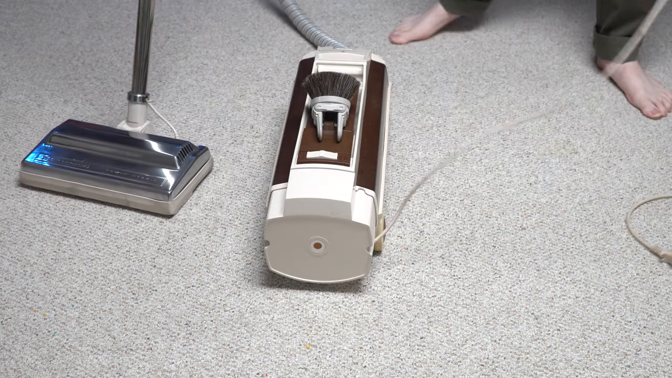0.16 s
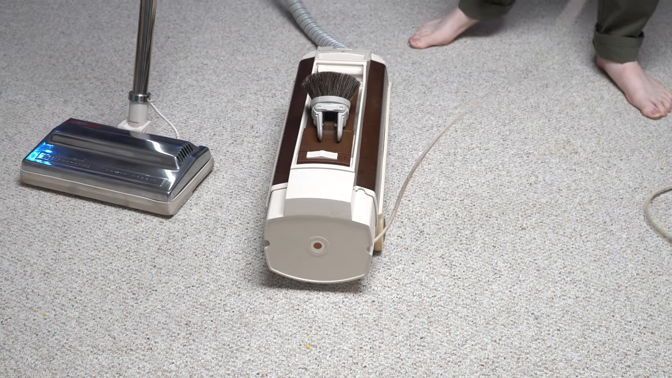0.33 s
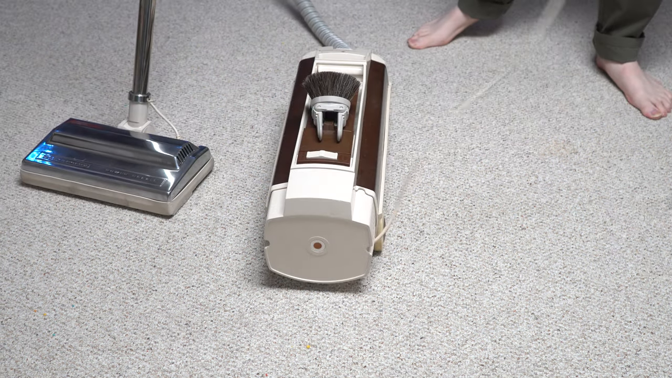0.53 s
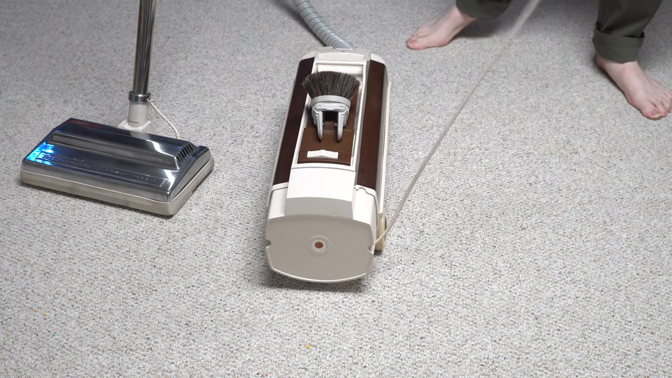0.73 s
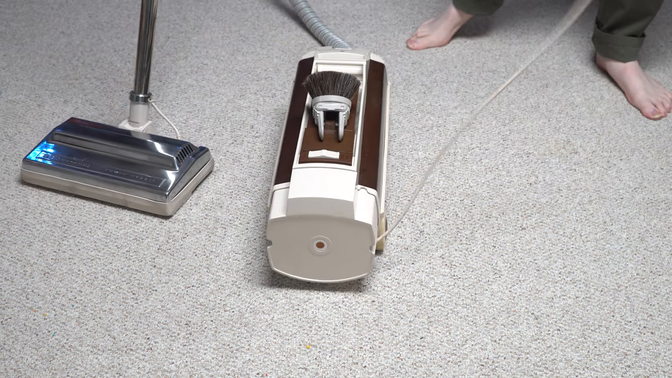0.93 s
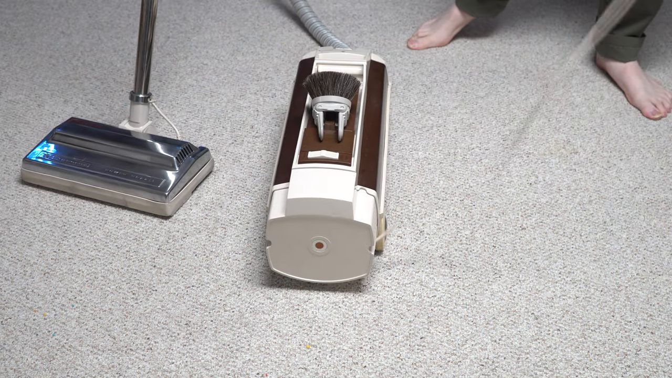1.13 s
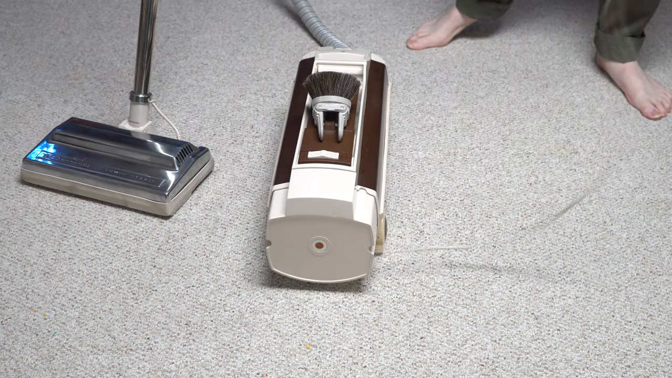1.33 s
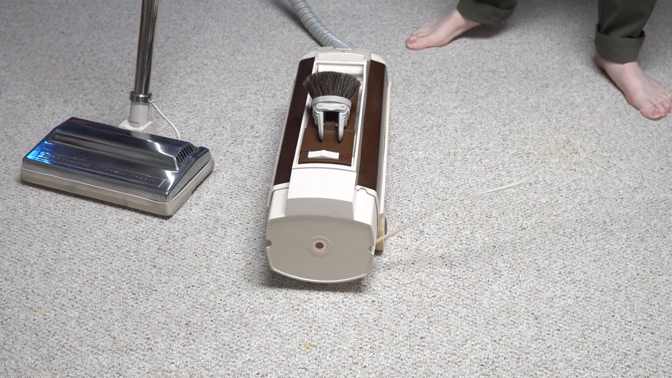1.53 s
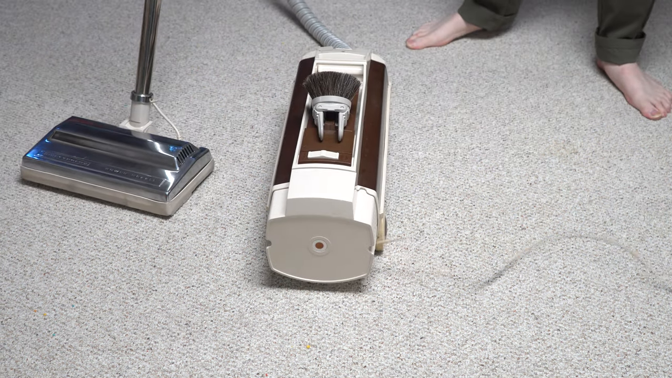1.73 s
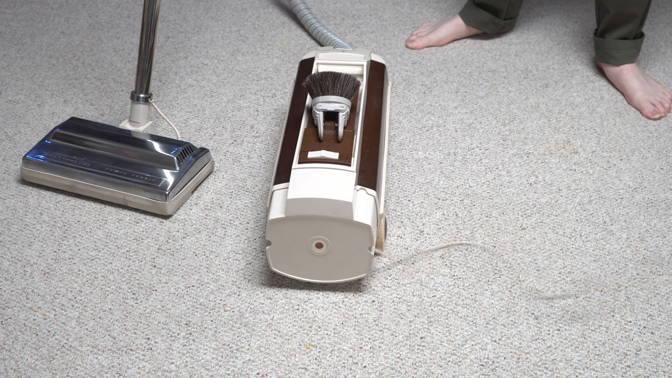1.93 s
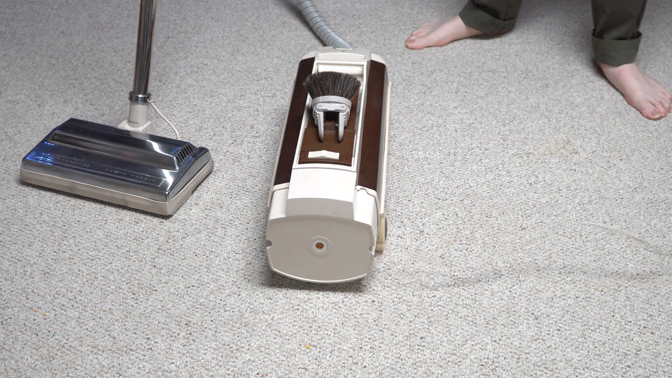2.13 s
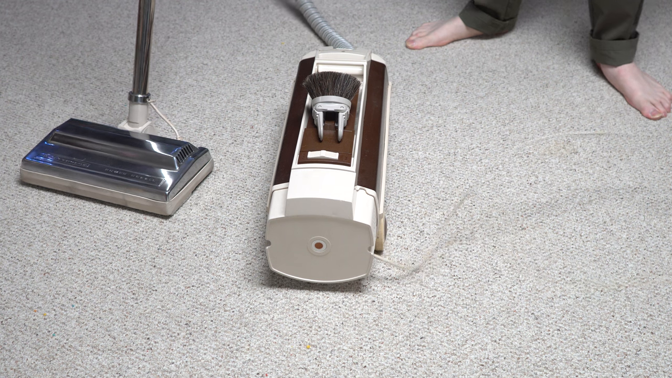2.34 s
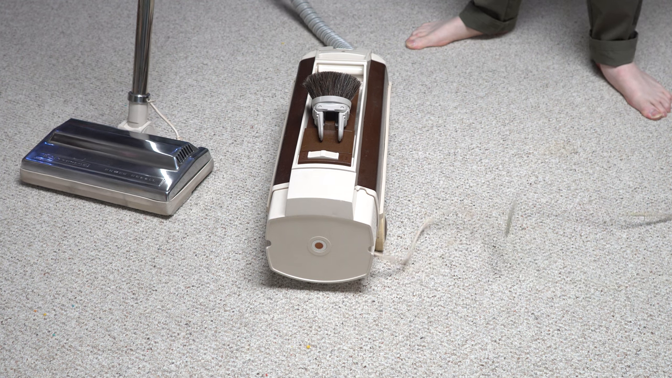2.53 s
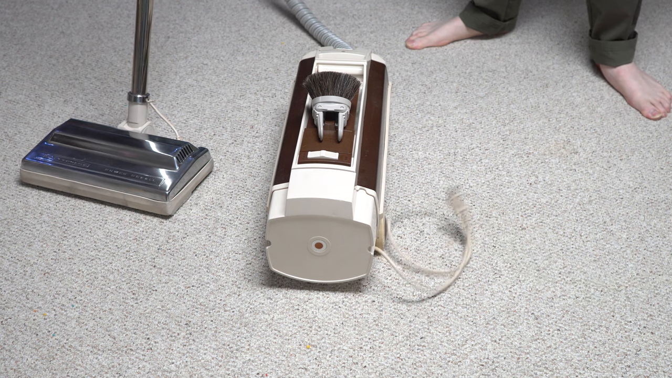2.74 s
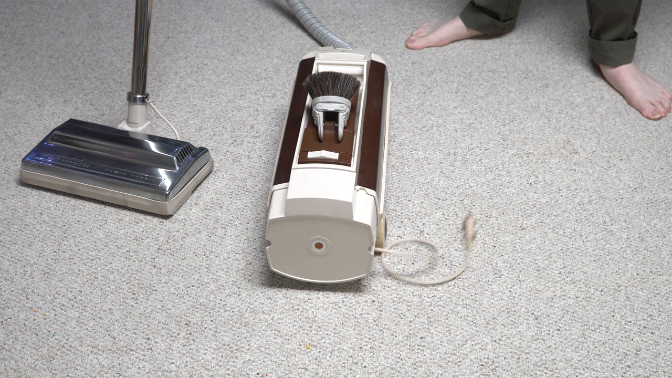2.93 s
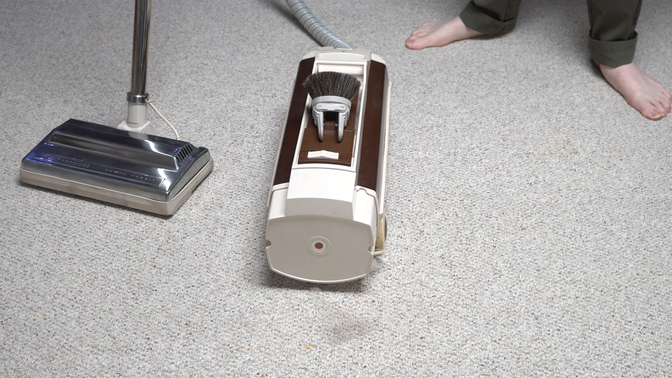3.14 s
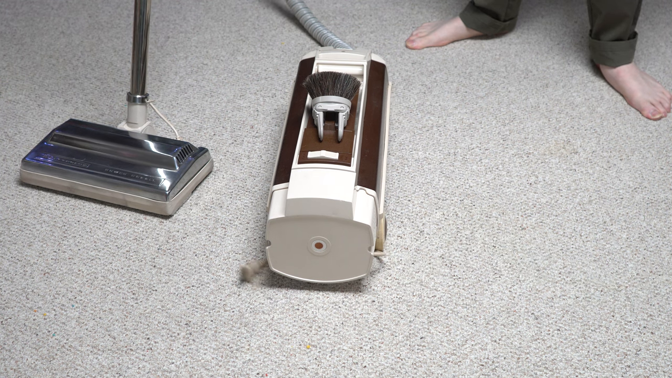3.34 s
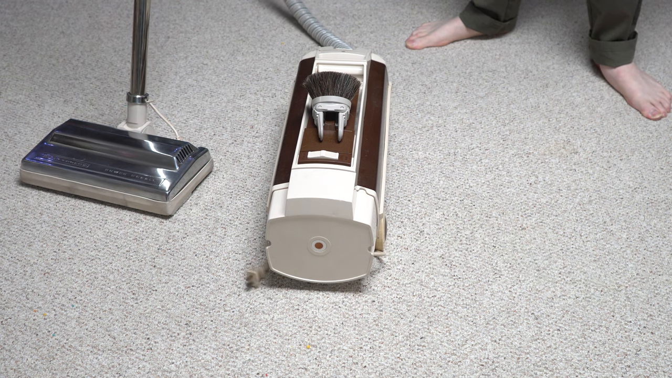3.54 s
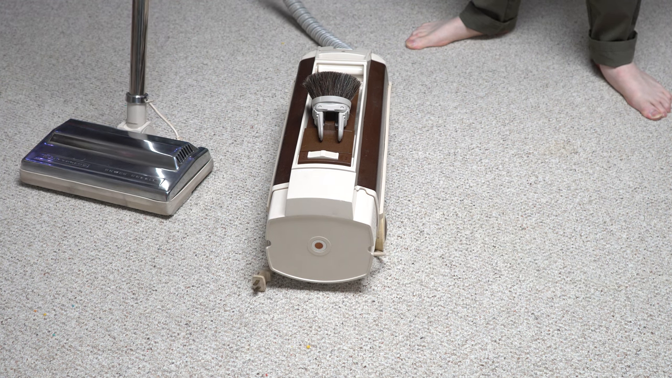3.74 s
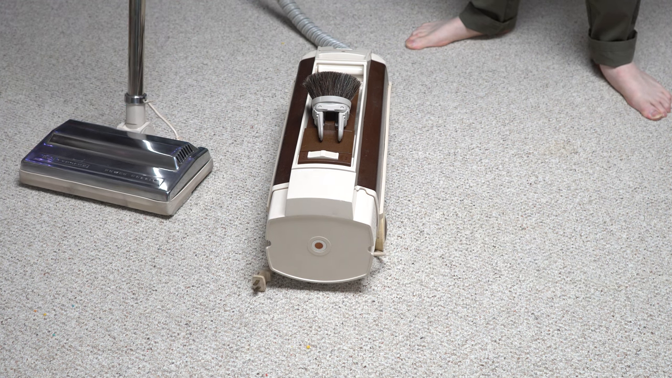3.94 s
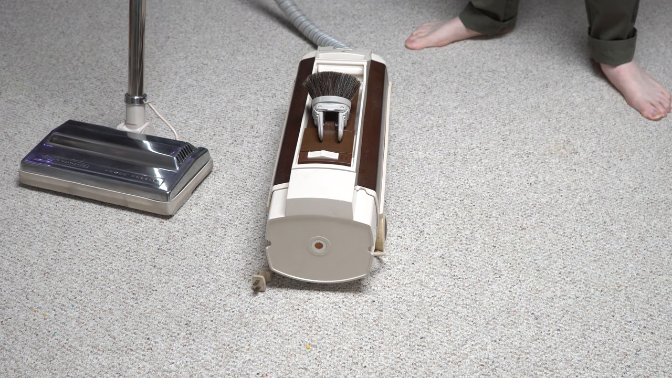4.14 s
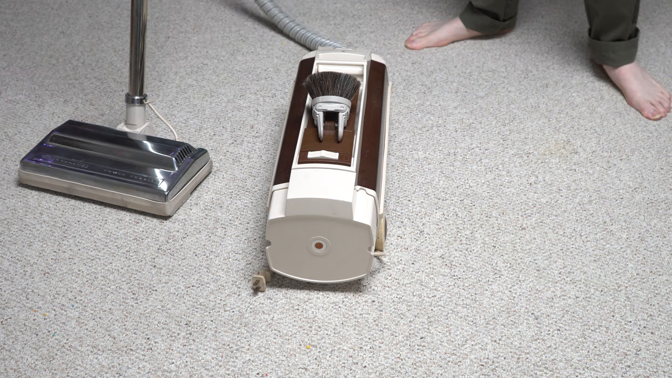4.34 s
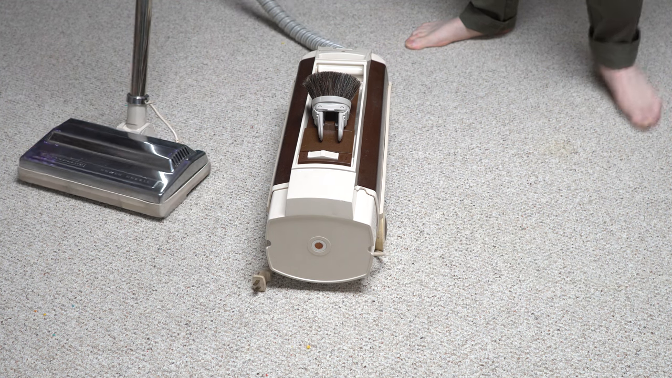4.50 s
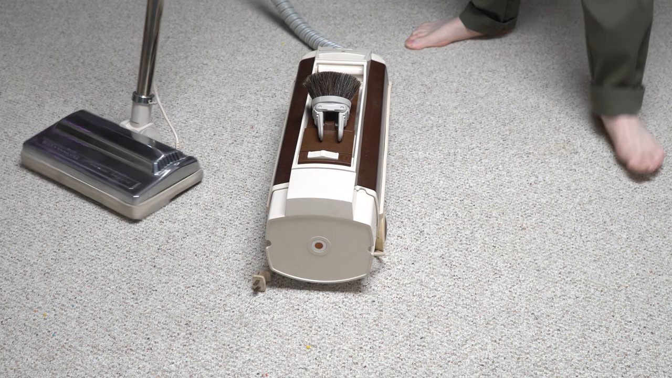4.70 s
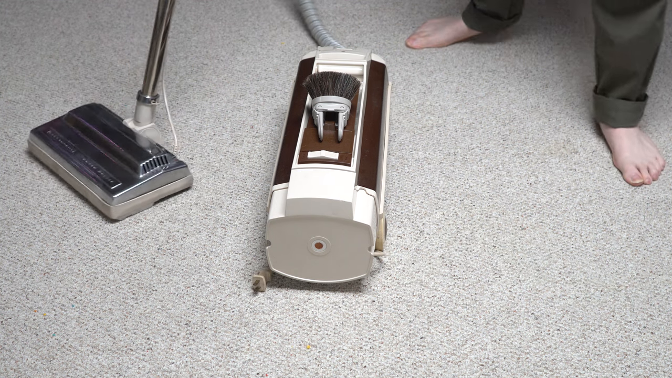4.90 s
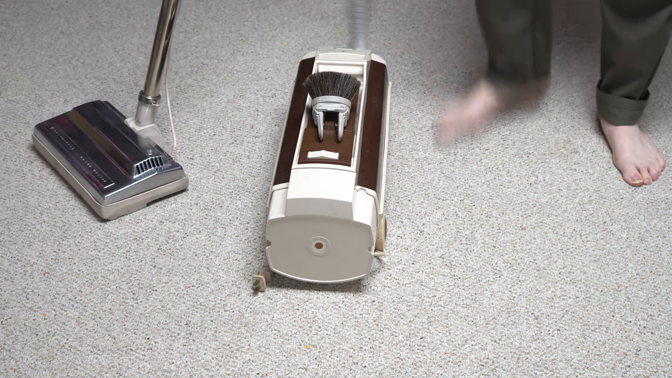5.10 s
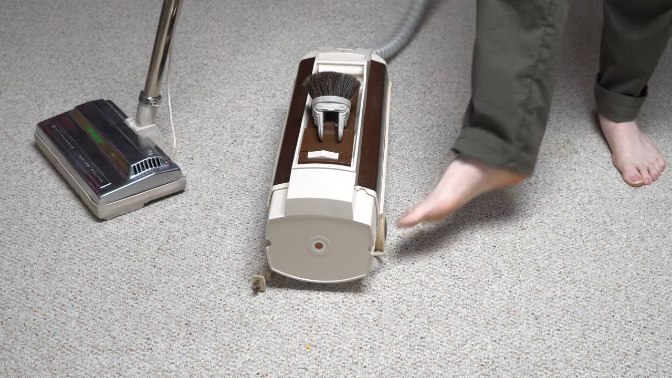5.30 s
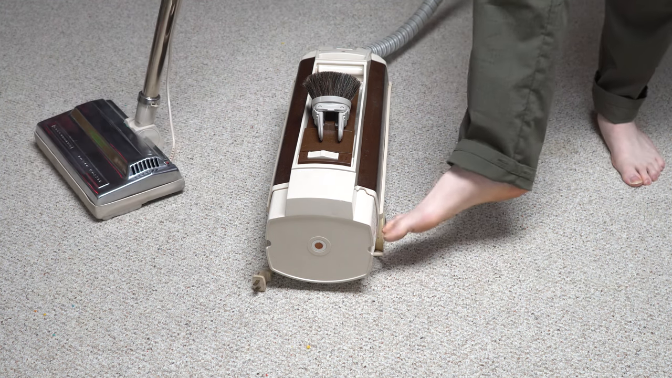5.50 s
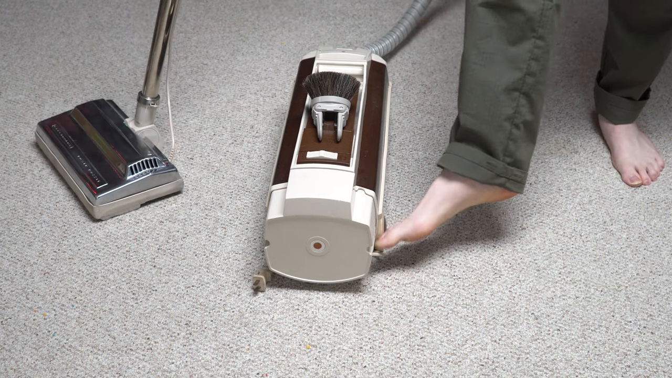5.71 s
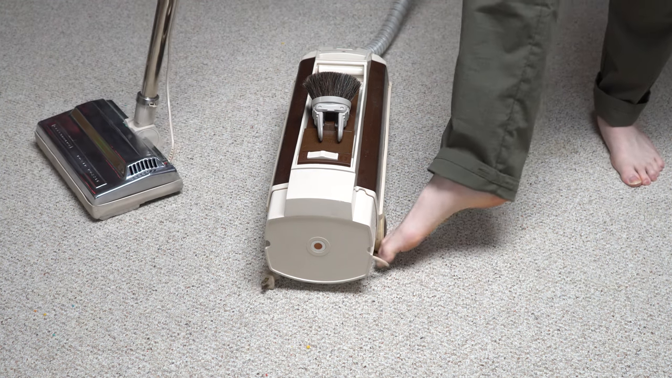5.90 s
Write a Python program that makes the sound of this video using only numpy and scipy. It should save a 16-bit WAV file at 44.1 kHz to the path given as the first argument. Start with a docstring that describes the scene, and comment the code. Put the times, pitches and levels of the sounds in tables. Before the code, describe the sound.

A spring-loaded cord drum spins inside a hollow plastic vacuum cleaner, heard close up and fairly dry. After light ticks it erupts into about a second of irregular hard clacking, rattle, low rumble and brief squeaks, slackens, then knocks again as the plug arrives. Afterwards the casing ticks faintly, footsteps scuff the carpet, and a foot touches the casing with small clicks over soft background hiss.

```python
"""Quiet carpeted room: the spring reel in a plastic vacuum cleaner winds its cord in.
Knocks ring the casing modes, the drum rumbles, rattles and squeaks, cord and plug thud as damped modes,
the sliding cord whizzes as resonant noise; afterwards the casing ticks faintly.
Feet and cord scuff the carpet as dense grains over a dull drag; a short room tail and faint hiss lie under it.
"""
import sys
import numpy as np
from scipy import signal
from scipy.fft import rfft, irfft
from scipy.io import wavfile

SR = 44100
rng = np.random.default_rng(int(sys.argv[2]) if len(sys.argv) > 2 else 0)


def unload_audio(sound):
    """Save the sound as a 16-bit wav file, at the path given as the first command line argument."""
    columns = np.transpose(np.atleast_2d(sound))
    # keep every value between -1 and 1, then stretch to whole-number steps
    steps = np.round(np.clip(columns, -1, 1) * 32767)
    wavfile.write(sys.argv[1], SR, steps.astype(np.int16))


N = 267246  # samples

# casing modes: f/Hz, width/Hz, relative level/dB
CASING_MODES = [(1129, 94, 2.5), (1497, 60, 2.6), (1828, 11, 2.5), (2525, 57, -2), (3060, 220, -11.5),
                (3670, 183, -0.5), (4020, 510, 0.5), (4500, 330, -5), (5080, 370, -11.5), (6250, 42, -14.5),
                (9440, 44, -31.5), (9800, 19, -35), (10230, 2200, -15.5), (11300, 52, -27.5)]
# broad colour of a knock: f/Hz, spectrum level/dB per Hz
CLACK_SPECTRUM = [(88, -48), (150, -0.5), (376, -6.5), (979, -4.5), (1290, -1.5), (1500, -8), (1660, -0.5),
                  (2500, 2.5), (3290, 3.5), (3700, 6.5), (8900, -32), (10600, -59), (16000, -43)]


def casing(drive, ring_db, strengths_db):
    """A hit plastic shell gives a broad clack plus its modes, each driven with its own strength."""
    rings = 0
    for (hz, width_hz, db), strength_db in zip(CASING_MODES, strengths_db):
        rings = rings + from_db(db) * resonate(drive * from_db(strength_db), hz, width_hz)
    return coloured(drive, CLACK_SPECTRUM) + from_db(ring_db) * rings


# drum cavity modes: f/Hz, width/Hz, relative level/dB
CAVITY_MODES = [(277, 200, -12), (386.3, 68, 4), (473.5, 110, -1), (691, 59, 1), (818, 84, -7)]
# knocks on the casing: t/s, middle-band peak level/dB, bass level/dB re middle,
# brightness level/dB re middle (before the two offsets below), leading mode f/Hz, chatter decay/ms
KNOCKS = [(0.0318, -35.5, -3.5, -32, 2860, 11), (0.167, -45, -6, -28, 2260, 4.3),
          (0.5328, -52, -1, -22, 1010, 6.6), (0.764, -48, 0, -20, 1490, 5), (0.779, -43, 2, -26, 1140, 16),
          (.832, -32, -15, -14, 1890, 7.9), (0.855, -21, -35, -15.5, 4504, 2.8),
          (.873, -44, -20, -9, 1880, 8.2), (0.8819, -26, -20, -3, 1940, 5.9),
          (0.924, -35, -14, -6.5, 4650, 11), (0.957, -44, -18, -20, 5090, 9.5),
          (1.0221, -57.5, 15, -19, 1130, 6.5), (1.122, -40.5, -8, -30, 1520, 33),
          (1.1636, -35.5, -7, -16, 1850, 14), (1.2, -26, -20, -20, 2530, 18),
          (1.3257, -19.5, -34, -30, 1510, 9.3), (1.3458, -20, -10, -15, 1770, 8.3),
          (1.3516, -11.5, -16, -10, 3870, 6.2), (1.3579, -6.5, -30, -13, 3840, 2.8),
          (1.4098, -21, -0.5, -27, 1040, 7.2), (1.4314, -21, -4.5, -29, 2530, 20),
          (1.4636, -12.5, -34, -8.5, 2550, 3.5), (1.51, -19, -5.5, -22, 1500, 12.4),
          (1.5752, -13, -42, -25, 2550, 7.6), (1.6069, -27, -5, -21, 2560, 7),
          (1.6396, -32, -4, -3, 2540, 12), (1.6712, -17, -12, -19, 1130, 24),
          (1.7051, -23, -3, -32, 1130, 9.3), (1.739, -19, -14, -16, 4500, 9),
          (1.8239, -13.5, -15, -9, 3700, 3.8), (1.8638, -8, -36, -17, 1500, 10),
          (1.9119, -12, -34, -8, 3440, 6), (1.9282, -20, -24, -24, 1090, 7.5),
          (1.9594, -25, -2, -25, 1500, 11), (1.993, -18.5, -2.5, -16, 1510, 21),
          (2.026, -13, -2.5, -13.5, 1060, 3.2), (2.062, -13, -35, -21, 1490, 8.8),
          (2.101, -21, -7, -14, 1140, 7), (2.1105, -13, -17, -16, 1110, 8.8),
          (2.147, -16.5, -5, -35, 2580, 4.8), (2.1851, -17, -21, -33, 3030, 6.4),
          (2.203, -23.5, 4, -29, 1010, 5), (2.222, -8, -21, -16.5, 3900, 6.7),
          (2.2416, -17.5, -8, -26, 1490, 13), (2.2751, -25, 0.5, -18, 2520, 23),
          (2.2862, -15, -7.5, -20, 1460, 6.3), (2.3835, -19.5, -30, -20, 3010, 10),
          (2.4068, -17, -6, -35, 1500, 12), (2.453, -29.5, -1, -30, 1520, 15),
          (2.4905, -19.5, -32, -16, 4110, 6.8), (2.4974, -9, -20.5, -16, 3710, 7.3),
          (2.5121, -12, -34, -13, 4040, 9.3), (2.621, -40, 2, -8, 1810, 6), (2.698, -45.5, 1, -2, 1090, 4),
          (2.7299, -22, -11, -19, 3060, 10), (2.7522, -14, -5.5, -37, 2540, 7.3),
          (2.771, -27, 3.5, -32, 2060, 11), (2.7894, -18.5, -23, -21, 1150, 8.4),
          (2.801, -21.5, -3.5, -31, 1100, 6.3), (2.8508, -33.5, 0.5, -28, 1490, 6.5),
          (2.8575, -34, 5, -27, 1480, 9.9), (2.9207, -32.5, -7.5, -28, 1520, 21),
          (2.9339, -35, 4, -19, 1080, 8), (3.0027, -30, -13, -28, 1830, 2.5),
          (3.0224, -30, -13, -30, 2560, 2.4), (3.058, -17, -12, -16, 3040, 16),
          (3.0665, -19, -9, -36, 3600, 5.6), (3.087, -13.5, -30, -26, 4000, 7.8),
          (3.0931, -14, -28, -18, 3970, 6.4), (3.125, -30, -1.5, -29, 3640, 17),
          (3.1659, -31.5, -1, -14, 3260, 17), (3.3461, -46, 6.5, -26, 1080, 9.9),
          (3.4062, -48, 8, -26, 1190, 3.3), (3.4518, -54, 8.5, -21, 1180, 7.4),
          (3.5276, -54, -4.5, -22, 1187, 5), (3.5998, -60, 11.5, -19, 1180, 11),
          (3.715, -52.5, 7, -22, 1250, 5.5), (3.8831, -51, 6, -21, 1240, 9.3),
          (4.1338, -45.5, -26, -4.5, 2620, 15.6), (4.261, -51.5, 0.5, -24, 2670, 15),
          (4.296, -48, 4, -24, 1230, 15), (4.413, -55, -7, -3, 1850, 7.4),
          (4.5036, -52, 10, -21, 1090, 4.8), (4.5688, -51.5, -14, -16, 1200, 6),
          (4.7083, -56.5, -20, 3, 2770, 4.6), (5.026, -48, -25, -20, 2220, 4.1),
          (5.4903, -53.5, 6, -28, 1180, 7.5), (5.603, -50, -13.5, -19, 2760, 2.9),
          (5.679, -50, -19, -22, 3710, 4.5), (5.6896, -49, -19, -24, 4000, 4.3),
          (5.6977, -34.5, -13, -38, 3050, 7.1), (5.7414, -50.5, 19, -32, 1110, 4.4),
          (5.7548, -44, -10.5, -29, 2570, 7.9), (5.8245, -44, -5, -22, 2650, 6.3),
          (5.885, -58, 13.5, -15, 1110, 6), (5.9075, -44.5, -5, -24, 1100, 4.6),
          (5.961, -44, 0, -28, 2500, 3.6), (5.9982, -48, 5, -22, 1100, 21)]
FIRST_TOUCH_DB = 2.5  # one clean contact opens every knock
KNOCK_RISE_MS = 0.68
TREBLE_OFFSET_DB, AIR_OFFSET_DB = 1.2, -4.05  # re brightness


def knocks():
    """A knock is a short chatter of contacts; where it lands sets bass, treble and leading modes."""
    size = SR // 6
    out = np.zeros(N + size)
    ms = np.arange(size) * 1000 / SR
    middle_band = band_filter(3, 1300, 6000)
    bass_band = band_filter(3, 170, 1300)
    treble_band = band_filter(3, 6000, 9000)
    air_band = band_filter(3, 9000, 14500)
    mode_hz = np.array(CASING_MODES)[:, 0]
    for s, peak_db, bass_db, bright_db, lead_hz, chatter_ms in KNOCKS:
        force = (1 - np.exp(-ms / KNOCK_RISE_MS)) * np.exp(-ms / max(chatter_ms, .3))
        contacts = force * grains(size, per_s=16000, spread_db=2.0)
        contacts[0] += from_db(FIRST_TOUCH_DB)

        octaves_off = np.log2(mode_hz / lead_hz)
        lead_db = 10.0 * np.exp(-(octaves_off / 0.053) ** 2)
        strengths_db = lead_db + rng.normal(0, 2.2, len(CASING_MODES))
        cavity = sum(from_db(db - 3.5) * resonate(contacts, hz, width_hz)
                     for hz, width_hz, db in CAVITY_MODES)
        sound = casing(contacts, ring_db=3.0, strengths_db=strengths_db) + cavity

        middle = rms_one(signal.sosfilt(middle_band, sound))
        mixed = middle + from_db(bass_db) * rms_one(signal.sosfilt(bass_band, sound))
        mixed += from_db(bright_db + TREBLE_OFFSET_DB) * rms_one(signal.sosfilt(treble_band, sound))
        mixed += from_db(bright_db + AIR_OFFSET_DB) * rms_one(signal.sosfilt(air_band, sound))
        at = round(s * SR)
        out[at:at + size] += from_db(peak_db) * mixed / np.abs(middle).max()
    return out[:N]


AFTERSHAKE_T60_S = 0.2


def aftershake_db():
    """Shaking left by the knocks: power steps up at each one, then dies away."""
    s, peak_db = np.transpose(KNOCKS)[:2]
    power = np.zeros(N)
    power[(s * SR).astype(int)] = from_db(2 * peak_db)
    keep_per_sample = from_db(-120 / (AFTERSHAKE_T60_S * SR))
    return 10 * np.log10(signal.lfilter([1], [1, -keep_per_sample], power + 1e-18))


# rattle of loose parts: t/s, level/dB
RATTLE = [(.6, -67), (.8, -60), (1.0, -57.5), (1.06, -67.5), (1.12, -54.5), (1.22, -51), (1.3, -45),
          (1.42, -37), (1.55, -36.5), (1.72, -37), (1.79, -37.5), (1.97, -33.5), (2.17, -40), (2.33, -37),
          (2.47, -42.5), (2.57, -49), (2.71, -58), (2.98, -58), (3.18, -51), (3.3, -74)]
# rumble of the running drum: t/s, level/dB (before lumps)
RUMBLE = [(.7, -71), (.87, -56.5), (1.05, -75), (1.12, -58), (1.23, -53), (1.28, -42.5), (1.36, -40.5),
          (1.43, -36.5), (1.56, -45.5), (1.66, -42), (1.7, -33.5), (1.785, -39), (1.84, -33), (1.95, -40),
          (2.12, -40), (2.31, -43.5), (2.37, -55.5), (2.43, -39.5), (2.56, -52.5), (2.72, -54.5),
          (3.0, -56), (3.13, -48), (3.3, -62)]
# cord sliding through the guide: f/Hz, width/Hz, relative level/dB
WHIZZ_BANDS = [(6790, 1300, 16), (10000, 900, -9.5), (12350, 7500, -15)]
RUMBLE_CUT_HZ, RUMBLE_SKIRT_WIDTHS = 160, 4.0  # soft bumps keep each mode within the skirt
LUMP_DB, LUMP_RATE_HZ = 1, 9.3  # uneven swell as the drum turns
WHIZZ_DB, WHIZZ_FOLLOWS, RATTLE_MEAN_DB = -51, 1.4, -38  # whizz dB per rattle dB about the mean
AFTERSHAKE_DB = (-35, -23.5, -30.5)  # cavity, loose parts, cord; re knock power


def drum():
    """The turning drum rumbles in its cavity, shakes loose parts against the casing, drags the cord."""
    gate, rattle_db = in_time(RATTLE)
    whizz_db = WHIZZ_DB + WHIZZ_FOLLOWS * (rattle_db - RATTLE_MEAN_DB)
    rumble_db = in_time(RUMBLE)[1] + LUMP_DB * drift(LUMP_RATE_HZ)

    bumps = grains(N, per_s=1100, spread_db=2.5)
    rumble = 0
    for hz, width_hz, db in CAVITY_MODES:
        skirt = resonate(bumps, hz, RUMBLE_SKIRT_WIDTHS * width_hz)
        rumble = rumble + from_db(db) * resonate(skirt, hz, width_hz)
    rumble = signal.sosfilt(signal.butter(3, RUMBLE_CUT_HZ, "high", fs=SR, output="sos"), rumble)

    shaking = from_db(2.5 * drift(40)) * grains(N, per_s=3000, spread_db=3.5)
    wander_db = [4.5 * drift(12) for _ in CASING_MODES]  # contact points move about
    rattle = casing(shaking, ring_db=1.5, strengths_db=wander_db)

    sliding = from_db(2.7 * drift(31.0)) * rng.standard_normal(N)
    whizz = 0
    for hz, width_hz, db in WHIZZ_BANDS:
        band = resonate(resonate(sliding, hz, width_hz), hz, width_hz)
        whizz = whizz + from_db(db + 2.4 * drift(25)) * band

    after_db = aftershake_db()
    out = np.zeros(N)
    layers = (rumble_db, rumble), (rattle_db, rattle), (whizz_db, whizz)
    for (level_db, layer), share_db in zip(layers, AFTERSHAKE_DB):
        level = np.hypot(from_db(level_db), from_db(after_db + share_db))
        out += level * rms_one(layer)
    return gate * out


# drum bearing squeaks: t/s, length/s, start f/Hz, end f/Hz, level/dB (before flutter), overtones/dB
SQUEAKS = [(.865, 0.015, 1970, 1820, -32.5, -3.5), (1.161, 0.051, 1863, 1925, -40.5, -9),
           (1.186, 0.022, 2290, 2150, -38, -2.5), (1.192, .058, 2890, 2770, -49, -18),
           (1.215, 0.056, 3350, 3020, -46, -9), (1.225, 0.072, 2590, 2527, -41, -17),
           (1.27, .065, 2465, 2570, -44, -15), (1.356, .051, 1814, 1774, -30, -1),
           (1.441, 0.048, 2608, 2467, -26, -12.5), (1.575, 0.029, 2617, 2606, -29, -27),
           (2.557, 0.049, 2323, 2290, -43.5, -2.5), (2.617, 0.077, 2600, 2640, -49.5, -6),
           (2.873, 0.03, 2420, 2720, -51, -1), (2.982, 0.023, 2586, 2510, -44, -16),
           (3.019, 0.032, 2580, 2620, -46, -15), (3.128, .025, 7800, 7600, -62, -40)]


def squeaks():
    """Short stick-slip tones of the bearing with overtones, unsteady in pitch and level."""
    out = np.zeros(N)
    waver = 0.025 * drift(270)
    flutter = from_db(2.17 * drift(170))
    for s, length_s, start_hz, end_hz, db, overtone_db in SQUEAKS:
        at, size = round(s * SR), round(length_s * SR)
        part = slice(at, at + size)
        hz = np.linspace(start_hz, end_hz, size) * (1 + waver[part])
        phase = 2 * np.pi * np.cumsum(hz) / SR
        overtones = np.sin(2 * phase) + 0.36 * np.sin(3 * phase)
        overtones += 0.132 * np.sin(4 * phase) + 0.14 * np.sin(5 * phase)
        tone = np.sin(phase) + from_db(overtone_db) * overtones
        out[part] += from_db(db) * signal.windows.tukey(size, .6) * flutter[part] * tone
    return out


# dull thuds of cord and plug: t/s, start level/dB (before band-pass), settled f/Hz, t60/s
THUDS = [(1.795, -4.5, 520, 0.0083), (1.806, -21.5, 497, 0.0315), (1.8125, -13, 386, 0.023),
         (2.755, -25, 255, 0.065), (2.891, -44, 167.3, .25), (3.067, -32.5, 410, 0.061),
         (3.095, -35.5, 428, .11), (4.51, -51, 200, 0.08), (5.2, -50, 347, .05)]
SLAP_SHARE, SLAP_S = 0.62, 0.00098  # pitch starts this share higher, sags as the contact spreads


def thuds():
    """One soft push rings a low, heavily damped mode; a small body sends out no deep bass."""
    out = np.zeros(N)
    t = np.arange(SR // 10) / SR
    for s, peak_db, hz, t60_s in THUDS:
        at = round(s * SR)
        cycles = hz * (t + SLAP_SHARE * SLAP_S * (1 - np.exp(-t / SLAP_S)))
        out[at:at + len(t)] += from_db(peak_db - 60 * t / t60_s) * np.sin(2 * np.pi * cycles)
    return signal.sosfilt(band_filter(2, 170, 4000), out)


# carpet fibre hiss: f/Hz, spectrum level/dB per Hz
CARPET_SPECTRUM = [(410, -16), (700, -6), (1250, -4.5), (1400, -3), (2810, -6), (5480, -11.5),
                   (8700, -25.5), (12000, -35), (15600, -54), (22000, -120)]
# scuffs: loudest t/s, swell/s, hold/s, fade/s, hiss level/dB, drag level/dB, hard edge/0-1
SCUFFS = [(0.263, 0.15, 0.075, 0.13, -49.5, -68, 0.08), (3.342, 0.35, 0.053, .25, -67, -59, 0.5),
          (3.534, 0.03, 0.0083, 0.034, -72, -56.5, 0.5), (4.515, 0.022, 0.018, 0.16, -59.5, -63.5, .4),
          (4.739, 0.05, 0.023, 0.055, -55, -60, 0.94), (5.027, 0.016, .075, 0.061, -47, -58.5, 0.42),
          (5.194, 0.023, 0.01, 0.035, -50, -61, 0.93), (5.495, 0.029, 0.0088, .04, -79, -59, .4),
          (5.707, .015, .012, 0.033, -60, -66, 0.4), (5.725, .03, .012, .06, -76, -59, 0.7),
          (5.828, 0.014, 0.0088, 0.039, -61, -67, .6), (6.004, 0.73, .07, .1, -62.5, -57, 0.66)]
# faint rustle of moving cloth and feet: t/s, hiss level/dB, drag level/dB
RUSTLE = [(4.4, -67, -88), (4.62, -74, -78), (4.7, -70, -92), (4.95, -63, -73), (5.25, -63.5, -66.5),
          (5.45, -64, -83), (5.65, -72, -75), (5.8, -80, -82)]
RUSTLE_EDGE = 0.26  # 0-1
SCUFF_EDGE_DB, SCUFF_POINT = -39, 0.95  # level at swell start and fade end; 1 = pointed, 2 = round


def scuffs():
    """Fibres snap back in a dense hiss over the dull drag of the weight; a hard edge narrows the hiss."""
    snaps = grains(N, per_s=15000, spread_db=-0.5)
    broad = rms_one(coloured(snaps, CARPET_SPECTRUM))
    narrow = rms_one(resonate(resonate(snaps, 2490, 1400), 1840, 1400))
    drag = rms_one(signal.sosfilt(band_filter(2, 200, 1100), rng.standard_normal(N)))

    def mix(hiss_db, drag_db, edge):
        edge = np.clip(edge, 0, 1)
        hiss = (1 - edge) * broad + edge * narrow
        return from_db(hiss_db) * hiss + from_db(drag_db) * drag

    gate, hiss_db, drag_db = in_time(RUSTLE)
    out = gate * mix(hiss_db, drag_db, RUSTLE_EDGE)
    t = np.arange(N) / SR
    for s, swell_s, hold_s, fade_s, hiss_db, drag_db, edge in SCUFFS:
        away = np.where(t < s, (s - t) / swell_s, np.maximum(t - s - hold_s, 0) / fade_s)
        envelope_db = np.maximum(SCUFF_EDGE_DB * away ** SCUFF_POINT, -120)
        out += from_db(envelope_db) * mix(hiss_db, drag_db, edge)
    return out


ROOM_T60_S, ROOM_DB, WALL_CUT_HZ = 0.28, -17, 4600


def room(x):
    """A dying noise tail, dulled by the walls."""
    t = np.arange(SR // 2) / SR
    tail = rng.standard_normal(len(t)) * from_db(-60 * t / ROOM_T60_S) * (t > .006)
    tail = signal.sosfilt(signal.butter(1, WALL_CUT_HZ, fs=SR, output="sos"), tail)
    tail /= np.sqrt(np.sum(tail ** 2))
    return from_db(ROOM_DB) * signal.fftconvolve(x, tail)[:N]


# background hiss: f/Hz, relative spectrum level/dB per Hz
FLOOR_SPECTRUM = [(12, -20), (20, -3.5), (52, -10), (138, -12.5), (182, -12), (255, -17), (472, -19),
                  (513, -17), (1400, -25), (2600, -26.5), (16000, -36.5)]
FLOOR_DB = -60.5  # rms


def background():
    """Steady noise with a fixed spectrum."""
    noise = rng.standard_normal(N + SR)
    return from_db(FLOOR_DB) * rms_one(coloured(noise, FLOOR_SPECTRUM)[SR:])


def from_db(db):
    """Decibels to amplitude."""
    return 10 ** (np.asarray(db) / 20)


def rms_one(x):
    """Scale to rms 1."""
    return x / np.sqrt(np.mean(x ** 2) + 1e-20)


def in_time(rows):
    """Columns joined by straight lines, and a gate open only inside the table."""
    s, *columns = np.transpose(rows)
    t = np.arange(N) / SR
    gate = np.clip(np.minimum(t - s[0], s[-1] - t) / .005 + .5, 0, 1)
    return [gate] + [np.interp(t, s, column) for column in columns]


def band_filter(order, low_hz, high_hz):
    """Butterworth band-pass sections."""
    return signal.butter(order, [low_hz, high_hz], "band", fs=SR, output="sos")


def resonate(x, hz, width_hz):
    """Two-pole resonance, gain 1 on top."""
    r = np.exp(-np.pi * width_hz / SR)
    zeros = [(1 - r * r) / 2, 0, (r * r - 1) / 2]
    poles = [1, -2 * r * np.cos(2 * np.pi * hz / SR), r * r]
    return signal.lfilter(zeros, poles, x + 1e-18)


def coloured(x, points):
    """Causal minimum-phase filter that follows a spectrum table."""
    hz, db = np.transpose(points)
    grid_hz = np.maximum(np.fft.rfftfreq(4096, 1 / SR), 1)
    gain = from_db(np.interp(np.log(grid_hz), np.log(hz), db))
    cepstrum = irfft(np.log(gain))
    cepstrum[1:2048] *= 2  # fold to the causal half
    cepstrum[2049:] = 0
    return signal.fftconvolve(x, irfft(np.exp(rfft(cepstrum))))[:len(x)]


def grains(size, per_s, spread_db):
    """Random clicks of uneven strength."""
    strength_db = spread_db * np.minimum(rng.exponential(1, size), 4)
    strength = from_db(strength_db) * rng.standard_normal(size)
    return strength * (rng.random(size) < per_s / SR)


def drift(rate_hz):
    """Slow random wander, rms 1."""
    r = np.exp(-2 * np.pi * rate_hz / SR)
    noise = rng.standard_normal(N + SR)
    return rms_one(signal.lfilter([1], [1, -2 * r, r * r], noise)[SR:])


def scene():
    """Cleaner with its room tail, carpet scuffs and background."""
    cleaner = knocks() + drum() + squeaks() + thuds()
    return (cleaner + scuffs() + room(cleaner) + background())[None]


CUTOFF_HZ = 16100  # stopband edge, 60 dB down


def record(dry):
    """Steep low-pass cuts the top."""
    return signal.sosfilt(signal.cheby2(14, 60, CUTOFF_HZ, fs=SR, output="sos"), dry)


dry = scene()
out = record(dry)
unload_audio(out)
```